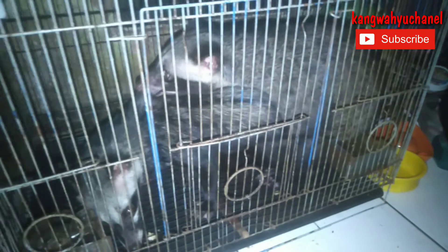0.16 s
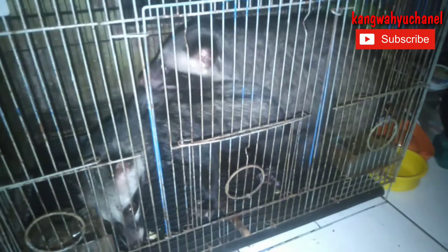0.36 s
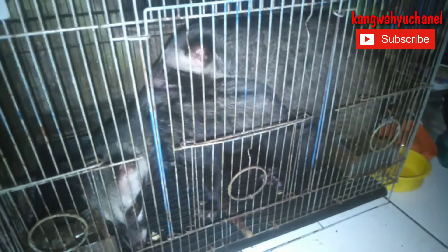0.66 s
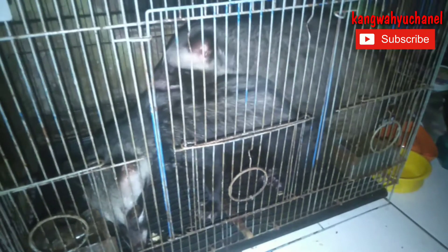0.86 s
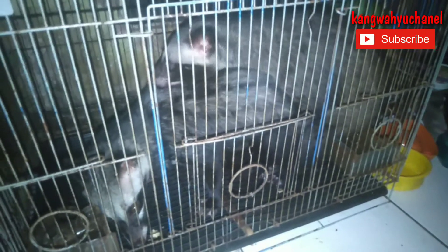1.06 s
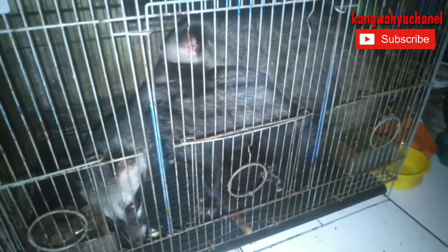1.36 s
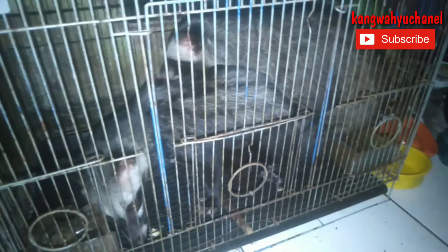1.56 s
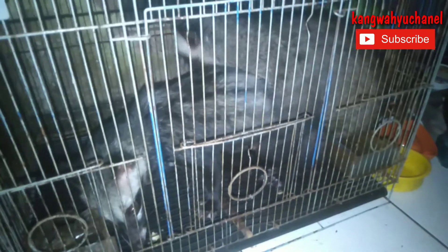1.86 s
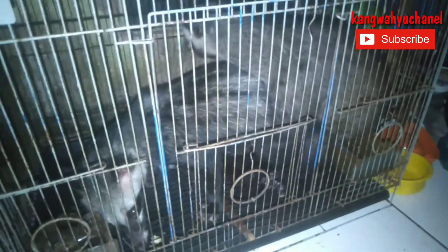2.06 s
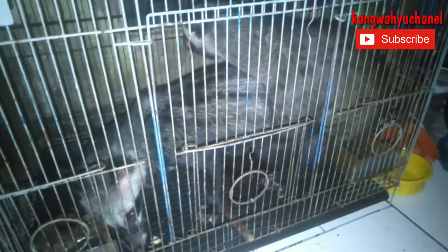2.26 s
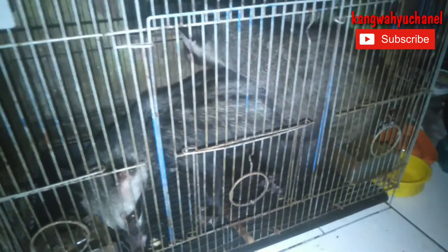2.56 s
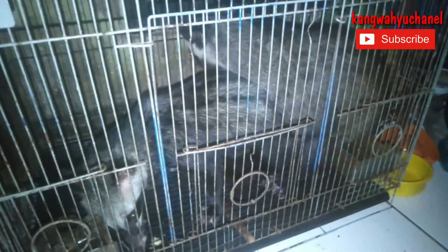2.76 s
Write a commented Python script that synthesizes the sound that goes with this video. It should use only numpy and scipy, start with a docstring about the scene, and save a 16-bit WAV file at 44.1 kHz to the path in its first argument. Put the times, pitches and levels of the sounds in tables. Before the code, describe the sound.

A caged civet close to the microphone makes a single piercing, drawn-out whine with slight wavering and breathy hiss, ending abruptly in a falling rasp; short tiled-room echo, quiet room tone and barely audible insect chirping.

```python
"""A faint insect chirps over the quiet tone of a small tiled room: both are filtered noise.
A caged civet close by then gives one long, high whine, built from 21 harmonics and some airy noise.
It starts softly with the mouth nearly shut, cracks upward, holds a clean pitch and drops away in a rasp.
Short hisses, puffs of noise, come at its start and cross the note; hard walls add a short tail."""
import sys
import numpy as np
from scipy import signal
from scipy.fft import rfft, irfft
from scipy.io import wavfile
from scipy.ndimage import uniform_filter1d

SR = 44100
rng = np.random.default_rng(int(sys.argv[2]) if len(sys.argv) > 2 else 0)


def inscribe(sig):
    """Save sig as 16-bit PCM at rate SR to the path in sys.argv[1].

    A 1-D sig is mono; a 2-D sig holds one channel per row.
    Samples are clipped to [-1, 1] before scaling.
    """
    pcm = np.round(np.clip(np.atleast_2d(sig).T, -1, 1) * 32767)
    wavfile.write(sys.argv[1], SR, pcm.astype(np.int16))


N = 127890  # length in samples
T = np.arange(N) / SR  # time of every sample, in seconds


def amp(db):
    """Turns decibels into gain."""
    return 10 ** (np.asarray(db) / 20)


def unit(x):
    """Scales a sound to an rms (average strength) of 1."""
    return x / np.sqrt(np.mean(x ** 2) + 1e-20)


def curve(points):
    """Joins (time, value) points with straight lines, read at every sample."""
    times, values = np.transpose(points)
    return np.interp(T, times, values)


def colour(points, hz):
    """Joins (frequency, value) points with straight lines on a log frequency axis."""
    frequencies, values = np.transpose(points)
    return np.interp(np.log(hz + 1), np.log(frequencies), values)


def noise(shape):
    """Noise of rms 1: the given function of frequency sets how strong each frequency is."""
    spectrum = rfft(rng.standard_normal(N))
    frequencies = np.fft.rfftfreq(N, 1 / SR)
    return unit(irfft(spectrum * shape(frequencies), N))


def drift(rate_hz):
    """Random wander of rms 1 that gets weaker above the given rate."""
    return noise(lambda f: 1 / (1 + (f / rate_hz) ** 2))


# Balance of the quiet background across pitch: frequency_hz, relative_level_db
BACKGROUND_COLOUR = [(20, -10), (50, 4), (70, -1.5), (130, -8), (190, -4), (270, -15.5), (600, -10.5),
                     (1200, -9), (2200, -13.5), (3200, -22.5), (5000, -29.5), (10000, -29.5),
                     (15000, -24.5)]
ROOM_TONE_DB = -65


def room_tone():
    """Quiet, steady background noise with a soft low rumble."""
    return amp(ROOM_TONE_DB) * noise(lambda f: amp(colour(BACKGROUND_COLOUR, f)))


INSECT_HZ, INSECT_WIDTH_HZ, INSECT_DB = 6660, 330, -69.5
CHIRP_S, CHIRP_PEAK_S, CHIRP_DEPTH = .1255, .058, .7  # time between chirps, time of a peak, depth 0-1


def insect():
    """A faint trill: a narrow band of noise that throbs about eight times a second."""
    throb = 1 + CHIRP_DEPTH * np.cos(2 * np.pi * (T - CHIRP_PEAK_S) / CHIRP_S)
    narrow_noise = noise(lambda f: 1 / (1 + ((f - INSECT_HZ) / INSECT_WIDTH_HZ) ** 2))
    return amp(INSECT_DB) * throb * narrow_noise


# A partial is one harmonic: partial 1 is the fundamental, partial k has k times its pitch.
# Pitch of the whine, before it wanders: time_s, pitch_hz
WHINE_PITCH = [(.05, 765), (.082, 695), (.105, 744), (.135, 744), (.172, 821), (.225, 742), (.285, 763),
               (.375, 736.4), (.4, 776), (.418, 842), (.432, 926), (.455, 886), (.475, 804), (.5, 776),
               (.56, 792.7), (.69, 775.8), (.745, 815), (.84, 787.3), (.91, 792.8), (.98, 790.5),
               (1.03, 811), (1.145, 785.8), (1.2, 830), (1.255, 806), (1.31, 816), (1.42, 795),
               (1.49, 800.2), (1.61, 778.7), (1.8, 782.4), (1.99, 777), (2.06, 799.2), (2.155, 811.3),
               (2.23, 789.4), (2.4, 775.6), (2.55, 752.2), (2.59, 739), (2.605, 712), (2.618, 682),
               (2.69, 646.5)]
# Loudness at the main resonance (partial 3), before the throat and room colour it: time_s, level_db
WHINE_EFFORT = [(.045, -71.5), (.058, -55), (.085, -56.5), (.125, -63), (.17, -52.5), (.2, -37),
                (.235, -47), (.285, -32), (.33, -44), (.37, -31.5), (.387, -40), (.4, -29), (.422, -39),
                (.438, -23.5), (.452, -38.5), (.475, -26), (.495, -26.5), (.58, -24), (.72, -24.5),
                (.79, -22.5), (.93, -24.5), (.98, -23), (1.04, -24.5), (1.15, -22.5), (1.2, -29.5),
                (1.25, -22.5), (1.31, -27), (1.38, -23), (1.6, -25), (1.8, -25), (1.87, -28), (1.96, -21.5),
                (2.0, -24.5), (2.09, -21.5), (2.16, -25.5), (2.2, -24.5), (2.29, -24.5), (2.36, -23.5),
                (2.51, -27.5), (2.545, -39), (2.57, -31), (2.598, -27), (2.622, -45.5), (2.64, -51),
                (2.69, -79)]
# Level of partial 2; the low partials lead while the mouth is nearly shut: time_s, level_db
LOW_LEVEL = [(.045, -72), (.058, -45.5), (.085, -58.5), (.105, -48), (.17, -47.5), (.22, -30.5), (.28, -32),
             (.34, -40), (.415, -35.5), (.48, -41.5), (.9, -38.5), (1.17, -38), (1.215, -50.5), (1.26, -39),
             (1.9, -37.5), (2.14, -35.5), (2.27, -36), (2.42, -38), (2.49, -42), (2.58, -45), (2.62, -57.5),
             (2.69, -75.5)]
# Level of the fundamental compared with partial 2: time_s, relative_level_db
FUNDAMENTAL_BALANCE = [(.05, -13.5), (.18, -8.5), (.23, -31.5), (.3, -16.5), (.35, -17), (.38, -35),
                       (.405, -10.5), (.42, -14.5), (.435, -3), (.455, -3), (.468, -25.5), (.49, -15),
                       (.6, -9), (.69, -18.5), (.78, -10), (1.17, -11), (1.215, -19.5), (1.27, -14),
                       (1.53, -9), (1.65, -20), (1.8, -14), (1.87, -23.5), (1.94, -13), (2.0, -24),
                       (2.06, -11), (2.3, -13), (2.43, -25.5), (2.53, -7), (2.595, -17), (2.62, 4.5),
                       (2.69, 14.5)]
# Level of partials 4 to 7, before the throat and room colour them: time_s, level_db
MIDDLE_LEVEL = [(.05, -50.5), (.085, -59.5), (.11, -45), (.15, -55), (.2, -38), (.25, -32.5), (.29, -20.5),
                (.36, -34), (.44, -24), (.53, -31), (.7, -25), (.76, -19), (.85, -30.5), (1.04, -22),
                (1.1, -26.5), (1.35, -24), (1.5, -25), (1.565, -31.5), (1.62, -22.5), (1.85, -25),
                (2.0, -24.5), (2.16, -20.5), (2.24, -25), (2.33, -23), (2.44, -28), (2.56, -30),
                (2.62, -59), (2.69, -73)]
# Level of partials 8 to 21, before the throat and room colour them: time_s, level_db
TREBLE_LEVEL = [(.05, -58.5), (.15, -61), (.21, -25), (.33, -30.5), (.44, -24), (.52, -31), (.74, -24.5),
                (.86, -26.5), (1.15, -26), (1.22, -21.5), (1.5, -25.5), (1.9, -27), (2.15, -21.5),
                (2.4, -24), (2.58, -28.5), (2.625, -38), (2.69, -81)]
# Roughness of the voice: time_s, roughness_0_to_1
ROUGHNESS = [(.05, 0.3), (.075, 0.11), (.38, 0.06), (.41, 0.49), (.44, 0.1), (.47, 0.5), (.5, .1), (.53, 0),
             (2.595, 0), (2.62, 0.86), (2.69, .35)]
# How the throat and room together colour partials 3 and up: frequency_hz, gain_db
THROAT_AND_ROOM_COLOUR = [(2000, 2.5), (2380, -0.5), (2750, -4), (2980, -24.5), (3120, -16), (3200, -23),
                          (3290, -18.5), (3550, -16), (3750, -32), (3900, -46), (4050, -30), (4300, -37),
                          (4550, -37), (4690, -47.5), (4830, -36), (5450, -42), (5900, -44.5),
                          (6250, -34.5), (6500, -39), (6750, -24), (7000, -26), (7300, -28.5), (7550, -27),
                          (7850, -39.5), (8100, -42), (8750, -39.5), (9300, -62.5), (10500, -60.5),
                          (11900, -67), (12600, -76), (13700, -75.5), (14200, -43.5), (15500, -55.5)]
# Balance of the air that rushes with the voice: frequency_hz, relative_level_db
AIR_COLOUR = [(300, -28), (700, -14), (1400, -8), (1800, -9.5), (2130, 15), (2450, -7.5), (2750, -23.5),
              (3500, -23), (4400, -19), (6000, -11), (7200, -4.5), (8500, -14), (9800, -32.5),
              (13500, -29.5), (14600, -17)]
AIR_DB, AIR_FOLLOWS = -57.5, 0.23  # level at median effort; dB of air per dB of effort
JITTER, JITTER_HZ = 0.0018, 28  # steady pitch wander: size as a fraction of the pitch, rate
RASP, RASP_HZ = .033, 169  # extra wander at full roughness: size as a fraction of the pitch, rate
FLUTTER_HZ = 16.7
MAIN_FLUTTER_DB, MIDDLE_FLUTTER_DB, TREBLE_FLUTTER_DB = .5, 3.5, 5
SHIMMER_DB = 7  # level shake of partials 1 to 3 at full roughness


def whine():
    """Vocal-fold harmonics, coloured by the throat and room, with a little air; roughness shakes them."""
    rough = np.clip(curve(ROUGHNESS), 0, 1)
    effort = curve(WHINE_EFFORT)
    low = curve(LOW_LEVEL)

    wander = JITTER * drift(JITTER_HZ) + RASP * rough * drift(RASP_HZ)
    hz = curve(WHINE_PITCH) * (1 + wander)
    phase = 2 * np.pi * np.cumsum(hz) / SR

    main_level = effort + colour(THROAT_AND_ROOM_COLOUR, 3 * hz)
    levels = []
    for db in (low + curve(FUNDAMENTAL_BALANCE), low, main_level):
        flutter = MAIN_FLUTTER_DB * drift(2 * FLUTTER_HZ)
        shimmer = SHIMMER_DB * rough * drift(RASP_HZ / 2)
        levels.append(db + flutter + shimmer)
    for k in range(4, 22):
        if k < 8:
            band, flutter_db = MIDDLE_LEVEL, MIDDLE_FLUTTER_DB
        else:
            band, flutter_db = TREBLE_LEVEL, TREBLE_FLUTTER_DB
        flutter = np.minimum(drift(FLUTTER_HZ), 1)  # dips are deeper than peaks
        levels.append(curve(band) + colour(THROAT_AND_ROOM_COLOUR, k * hz) + flutter_db * flutter)

    folds = np.zeros(N)
    for k, db in enumerate(levels, 1):
        folds += np.sqrt(2) * amp(db) * np.cos(k * phase)  # sqrt(2) makes the level an rms level

    air_db = AIR_DB + AIR_FOLLOWS * (effort - np.median(effort))
    air = amp(air_db) * noise(lambda f: amp(colour(AIR_COLOUR, f)))

    # The voice is silent outside the call, with short ramps at both ends
    sounding = (T > WHINE_EFFORT[0][0]) & (T < WHINE_EFFORT[-1][0])
    gate = uniform_filter1d(sounding * 1., size=200)
    return gate * (folds + air)


# Short hisses: start_s, fade_length_s, level_db (before the rise and fade), centre_hz, width_octaves
HISS_EVENTS = [(0.047, 0.027, -52.5, 1300, 0.99), (0.439, .07, -60, 4350, 0.71),
               (0.535, 0.036, -54.5, 1316, 0.36), (0.914, .06, -52.5, 4600, 0.79),
               (1.79, 0.099, -72.5, 4650, .5)]
HISS_RISE_S = .012


def hisses():
    """Brief puffs of noise, each around its own pitch, that rise quickly and fade."""
    out = np.zeros(N)
    for start, length, db, hz, octaves in HISS_EVENTS:
        age = np.maximum(T - start, 0)
        rise = np.minimum(age / HISS_RISE_S, 1)
        fade = np.exp(-2 * (age / length) ** 2)
        puff = noise(lambda f: 1 / (1 + (np.log2((f + 1) / hz) / octaves) ** 2) ** 2)
        out += amp(db) * rise * fade * puff
    return out


# Time the room's tail takes to fall by 60 dB: frequency_hz, fall_time_s
TAIL_DECAY = [(650, .33), (900, 0.38), (2300, 0.26), (7000, 0.58), (15000, 0.05)]
# Colour of the tail, added to its overall level: frequency_hz, gain_db
TAIL_BALANCE = [(700, 0), (900, -3.5), (1700, 2.5), (2380, -1), (2700, 3), (3500, 5), (4500, 0), (7500, -3),
                (15000, -3)]
TAIL_DB = -14


def room(x):
    """Direct sound plus a short diffuse tail from hard walls and floor: noise that dies away."""
    hz, t, grains = signal.stft(rng.standard_normal(SR // 2), SR, nperseg=256)
    fall_time = colour(TAIL_DECAY, hz)[:, None]
    tail = signal.istft(grains * amp(-60 * t / fall_time), SR, nperseg=256)[1]
    tail[:220] = 0  # the tail begins 5 ms after the direct sound
    tail /= np.linalg.norm(tail)

    # Doubled length keeps the end of the tail from wrapping round to the start
    frequencies = np.fft.rfftfreq(2 * N, 1 / SR)
    response = rfft(tail, 2 * N) * amp(TAIL_DB + colour(TAIL_BALANCE, frequencies))
    return x + irfft(rfft(x, 2 * N) * response)[:N]


def scene():
    """The civet's whine and the hisses in the room, over the insect and the background."""
    civet = room(whine() + hisses())
    return (civet + insect() + room_tone())[None]


EDGE_HZ = 15450


def record(dry):
    """The band limit of the recorder: a filter that removes the highest treble."""
    low_pass = signal.firwin(511, EDGE_HZ, window=("kaiser", 9), fs=SR)
    return signal.oaconvolve(dry, low_pass[None], "same")


dry = scene()
out = record(dry)
inscribe(out)
```